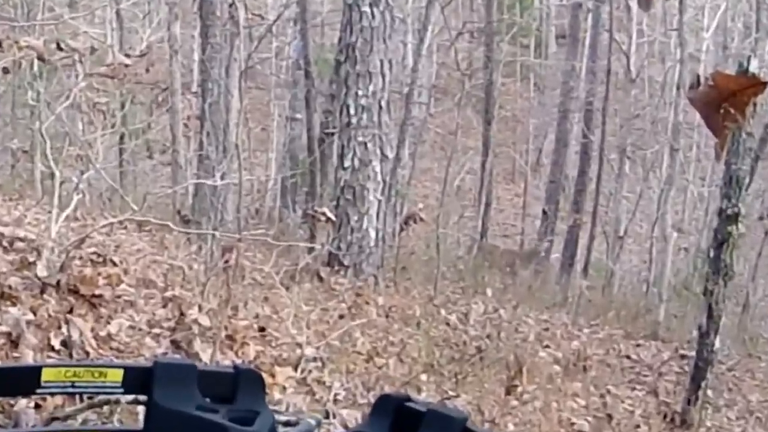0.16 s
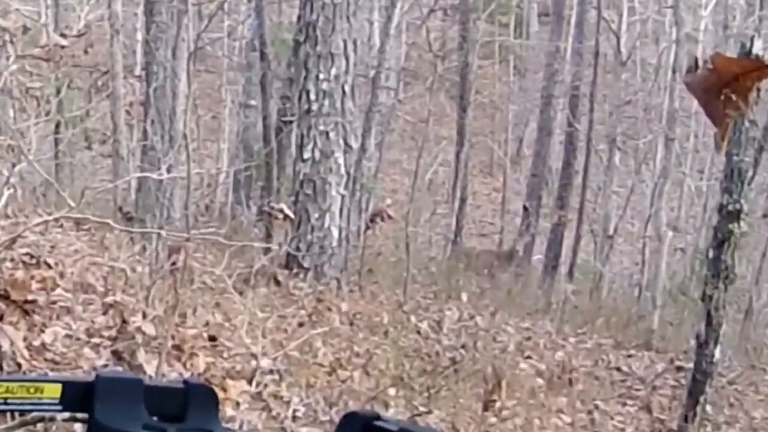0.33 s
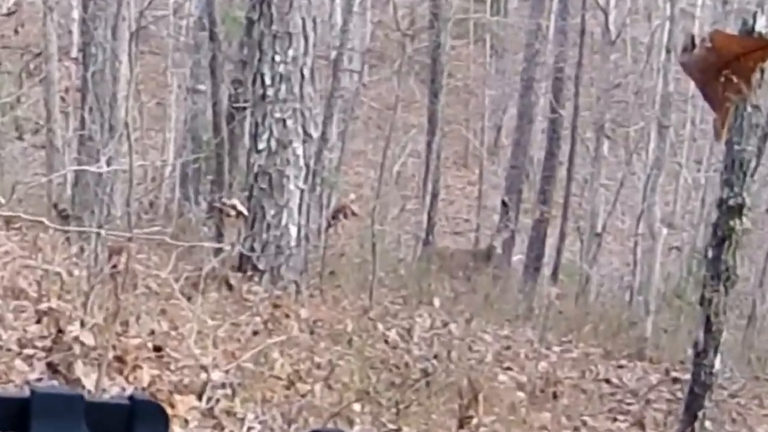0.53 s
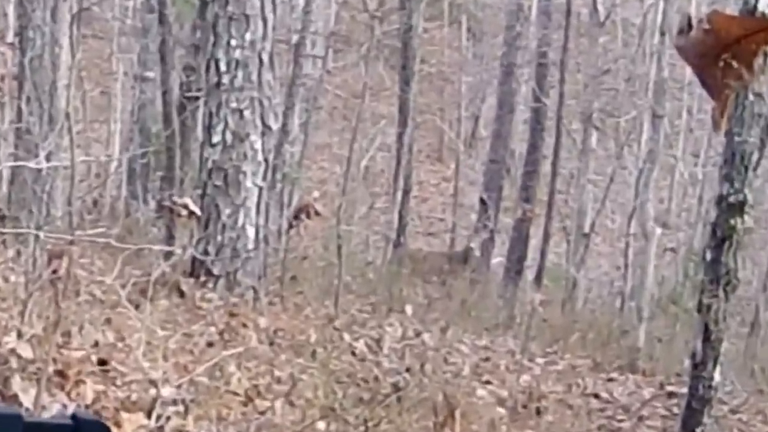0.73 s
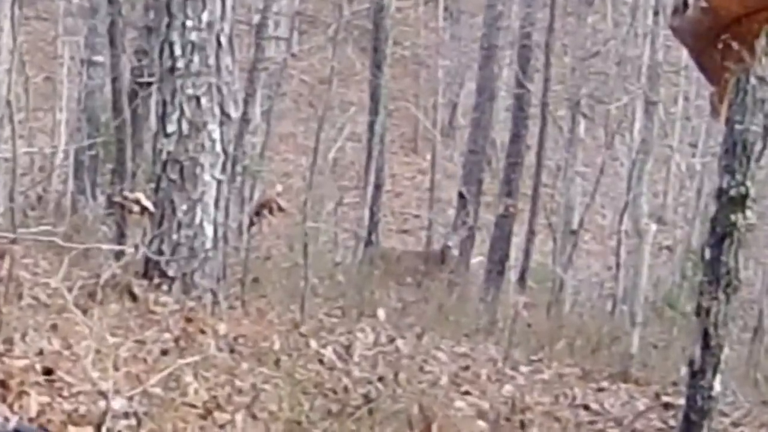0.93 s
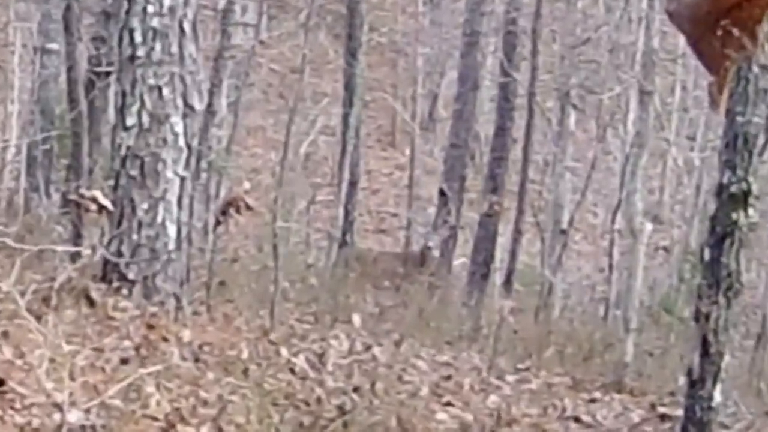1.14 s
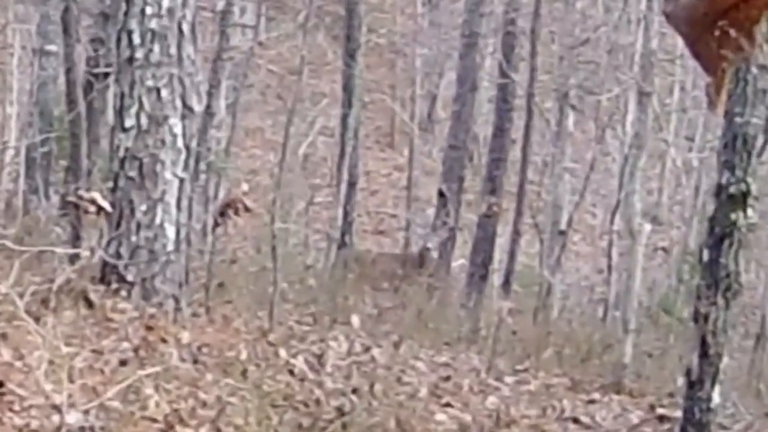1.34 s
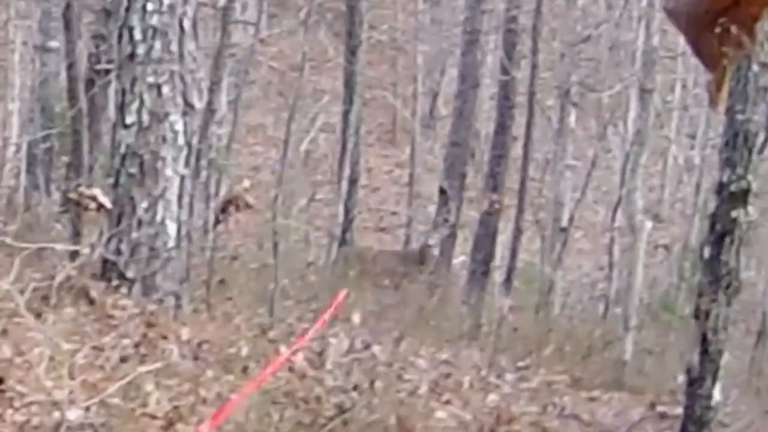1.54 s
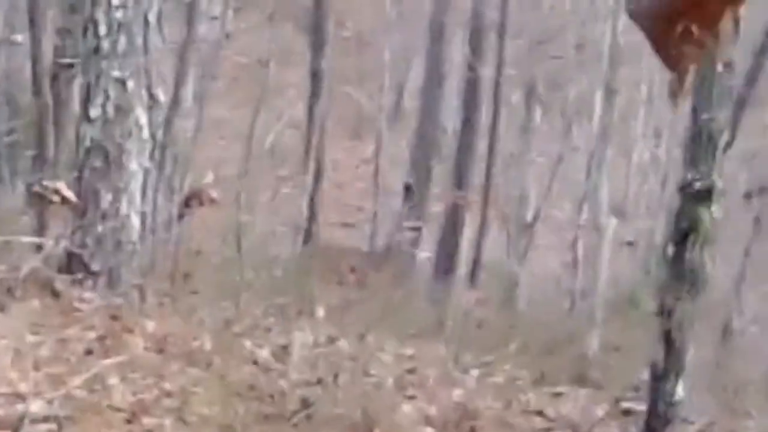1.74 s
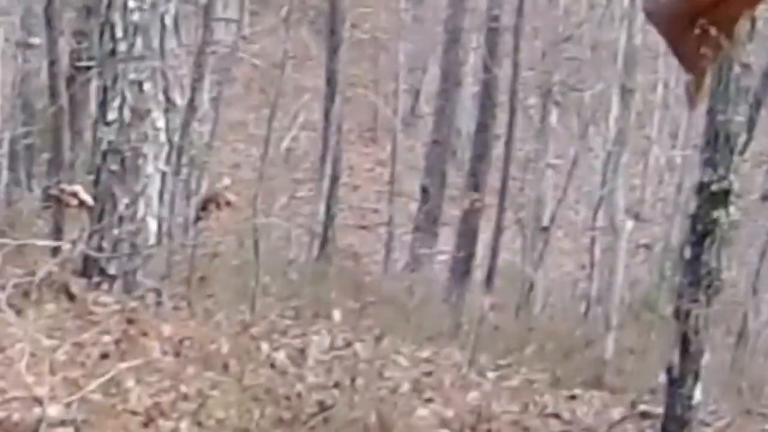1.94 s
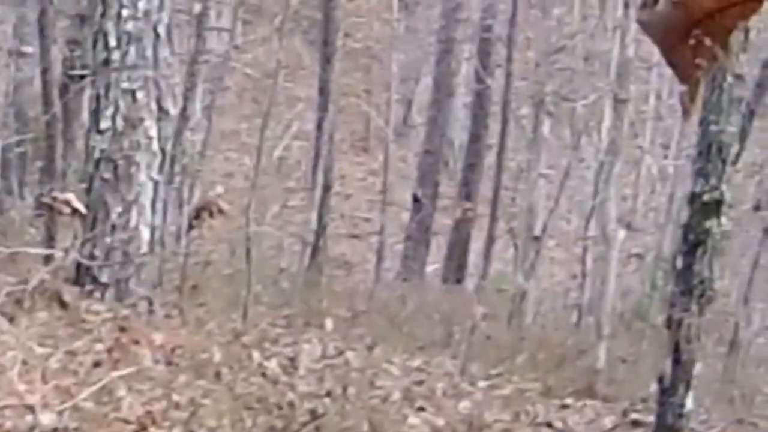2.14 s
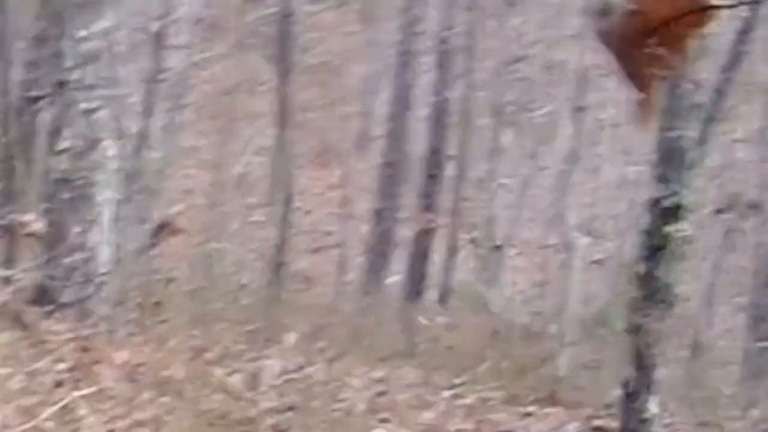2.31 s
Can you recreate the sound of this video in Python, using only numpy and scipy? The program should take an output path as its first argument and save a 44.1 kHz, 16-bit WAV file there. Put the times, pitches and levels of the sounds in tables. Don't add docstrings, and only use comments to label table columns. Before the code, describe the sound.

After a second and a half of soft outdoor hiss, a crossbow string slams with a loud dry crack, slightly overloading the near microphone; faint leaf rustle, a far bolt strike and twig clicks follow.

```python
import sys
import numpy as np
from scipy import signal
from scipy.io import wavfile
from scipy.ndimage import uniform_filter1d

SR = 44100
rng = np.random.default_rng(int(sys.argv[2]) if len(sys.argv) > 2 else 0)


def pcm_store(signal):
    levels = np.round(np.clip(np.atleast_2d(signal), -1, 1) * 32767)
    wavfile.write(sys.argv[1], SR, levels.astype(np.int16).T)


def invert_db(level):
    return 10 ** (np.asarray(level, dtype=float) / 20)


N = 104649
FAR_TOP_HZ = 15350

# frequency in Hz, level in dB per Hz.
HUSH_TONE = [(30, 2), (70, 1), (300, -2), (1000, -7.5), (2500, -14), (5000, -21), (9000, -25),
             (15200, -27.5)]
# frequency in Hz, width in Hz, level in dB.
LATCH_PEAKS = [(900, 600, -9), (1400, 500, -5), (1900, 300, -2), (2900, 600, -1), (3630, 400, 3),
               (4500, 700, -3), (5450, 700, -1), (7000, 900, -6), (8400, 700, -6), (10100, 800, -14),
               (13900, 1000, -18), (15300, 900, -19)]
# frequency in Hz, width in Hz, level in dB.
RISER_PEAKS = [(620, 250, -3), (850, 250, -5), (1260, 200, 1), (1500, 350, 0), (1800, 250, -3),
               (2330, 400, -4), (3190, 400, -3), (3900, 600, -1), (4900, 700, -5), (7200, 1000, -11),
               (8800, 1000, -13), (10500, 1200, -18), (13000, 2200, -20)]
# start in seconds, hold in seconds, T60 in seconds, level in dB.
LATCH_RELEASE = (1.6022, .003, .06, -11)
# start in seconds, frequency in Hz, cycles, level in dB.
STRING_STOP = [
    (1.6102, 170, .5, -12),
    (1.6116, 410, 1.95, -1),
]
# start in seconds, hold in seconds, T60 in seconds, level in dB.
RISER_CRACKS = [
    (1.6108, .002, .02, -18),
    (1.6132, .0022, .012, -7),
    (1.616, .004, .05, -17),
]
# start in seconds, frequency in Hz, level in dB, T60 in seconds.
LIMB_RINGS = [
    (1.613, 245, -19, .08),
    (1.613, 150, -21, .04),
    (1.612, 65, -27, .1),
    (1.6127, 1245, -5, .03),
    (1.624, 455, -18, .052),
    (1.614, 850, -17, .04),
]
# frequency in Hz, T60 in seconds.
SCATTER_DECAY = [(60, .9), (300, .5), (1000, .6), (4000, .6), (9000, .5), (15000, .5)]
# frequency in Hz, level in dB.
SCATTER_TONE = [(60, 2), (200, -4), (400, -9), (600, 4), (1300, 1), (3500, 1), (8000, -2), (15000, 2)]
# centre in seconds, half width in seconds, level in
# dB.
SOFT_SWELLS = [
    (1.675, .025, -53),
    (1.73, .045, -58),
    (2.005, .045, -59),
    (1.93, .08, -62),
    (2.12, .1, -65),
    (2.35, .03, -62),
]
# frequency in Hz, width in Hz, level in dB.
TWIG_PEAKS = [(700, 600, -9), (1420, 700, -4), (2300, 900, -5), (3200, 900, 0), (4050, 900, -1),
              (5000, 1200, -6), (8100, 1500, -8), (9600, 1600, -16), (13500, 2000, -22), (14900, 1000, -19)]
# start in seconds, frequency in Hz, cycles, level in dB.
STOCK_KNOCKS = [
    (1.941, 80, 2.1, -42),
    (1.982, 75, 1.2, -49),
    (2.026, 110, 1.1, -51),
    (2.22, 120, 1.5, -51),
    (1.929, 560, 4.5, -51),
    (1.715, 68, 2.4, -49),
]
# start in seconds, level in dB, brightness factor, hiss level in dB, hiss T60 in seconds.
TWIG_CLICKS = [
    (1.7865, -44, 1.05, -55, .4),
    (1.7882, -40, 1.04, -70, .1),
    (2.2632, -26, 1.0, -51, .4),
]
# frequency in Hz, width in Hz, level in dB.
CLICK_PEAKS = [(1420, 300, -9), (3350, 650, -1), (4050, 800, 0), (8200, 900, -5), (13400, 600, -26),
               (14900, 500, -24)]
# start in seconds, level in dB.
HEAD_CRACK = (1.8349, -22)
# frequency in Hz, width in Hz, level in dB.
HEAD_PEAKS = [(1000, 900, -4), (2930, 700, 1), (4200, 1400, -5), (7700, 1200, -11), (9100, 900, -8),
              (13500, 2500, -17), (15200, 1000, -14)]
# start in seconds, hold in seconds, T60 in seconds, level in dB.
BOLT_STRIKES = [
    (1.835, .005, .06, -39),
    (1.84, .02, .8, -52),
    (1.866, .01, .1, -49),
]
# frequency in Hz, width in Hz, level in dB.
THUD_PEAKS = [(60, 40, 6), (160, 100, 2), (500, 250, 2), (700, 250, 3), (1030, 400, 0), (1700, 700, -4),
              (2900, 900, -8), (4500, 1500, -12), (7700, 1800, -16), (9500, 2000, -17), (14000, 2500, -21)]
# frequency in Hz, width in Hz, depth in dB.
HOUSING_NOTCHES = [(6050, 500, -12), (12050, 400, -13)]


def evened(x):
    return x / np.sqrt(np.mean(x ** 2) + 1e-20)


def read(points, hz):
    f, value = np.transpose(points)
    return np.interp(np.log(hz + 1), np.log(f + 1), value)


def hush():
    frames, hz = N // 256 + 5, np.fft.rfftfreq(1024, 1 / SR)
    a, b, patches = rng.standard_normal((frames, 513, 3)).T
    patches = uniform_filter1d(patches, 12, 0)
    patches = evened(uniform_filter1d(patches, 14, 1))
    gain = invert_db(read(HUSH_TONE, hz)[:, None] + .5 * patches)
    in_band = (hz > 0) & (hz < FAR_TOP_HZ)
    noise = signal.istft((a + 1j * b) * gain * in_band[:, None], nperseg=1024, noverlap=768)[1]
    return invert_db(-59) * evened(noise[:N])


def add(mix, s, sound):
    part = mix[round(s * SR):][:len(sound)]
    part += sound[:len(part)]


def body(x, peaks, shift=1):
    out = 0
    for k, (hz, width, db) in enumerate(peaks):
        r = np.exp(-np.pi * width / SR)
        w = 2 * np.pi * hz * shift / SR
        ring = signal.lfilter([np.sin(w) * (1 - r)], [1, -2 * r * np.cos(w), r * r], x)
        out = out + (-1) ** k * invert_db(db) * ring
    return out


def rattle(hold, t60, db, peaks, spread_db=2.2):
    t = np.arange(0, .4, 1 / SR)
    ticks = rng.standard_normal(len(t)) * invert_db(spread_db * rng.exponential(1, len(t)))
    shape = np.minimum(t / .0006, 1) * invert_db(-60 * np.maximum(t - hold, 0) / t60)
    level = np.sqrt(np.mean(body(ticks[:4000], peaks) ** 2))
    return invert_db(db) * body(ticks * shape, peaks) / level


def latch():
    out = np.zeros(N)
    start, *row = LATCH_RELEASE
    add(out, start, rattle(*row, LATCH_PEAKS))
    return out


def swing(hz, cycles, db):
    u = np.arange(0, cycles, hz / SR)
    return invert_db(db) * np.sin(2 * np.pi * u) * np.sin(np.pi * u / cycles) ** .35


def string_stop():
    out = np.zeros(N)
    for s, *row in STRING_STOP:
        add(out, s, swing(*row))
    for s, *row in RISER_CRACKS:
        add(out, s, rattle(*row, RISER_PEAKS))
    return out


def limbs():
    out, t = np.zeros(N), np.arange(0, .2, 1 / SR)
    for s, hz, db, t60 in LIMB_RINGS:
        add(out, s, np.minimum(t * hz, 1) * invert_db(db - 60 * t / t60) * np.sin(2 * np.pi * hz * t))
    return out


def wood(x):
    stand_s, stand_width_s, stand_db = .068, .012, 5
    taps = np.zeros(SR)
    at = np.arange(900, SR - 20, 20)
    taps[at + rng.integers(0, 20, len(at))] = rng.choice([-1., 1.], len(at))
    hz, t, z = signal.stft(taps, SR, nperseg=512)
    stand = stand_db * np.exp(-((t - stand_s) / stand_width_s) ** 2)
    decay = -60 * t / read(SCATTER_DECAY, hz)[:, None]
    z = z * invert_db(stand + read(SCATTER_TONE, hz)[:, None] + decay)
    tail = signal.istft(z, SR, nperseg=512)[1]
    return invert_db(-32) * signal.fftconvolve(x, tail / np.linalg.norm(tail))[:N]


def soft_swells():
    t = np.arange(N) / SR
    grains = rng.standard_normal(N) * invert_db(1.4 * rng.exponential(1, N))
    swells = sum(invert_db(db) * np.exp(-((t - s) / w) ** 2) for s, w, db in SOFT_SWELLS)
    return evened(body(grains, TWIG_PEAKS)) * swells


def stock():
    out = np.zeros(N)
    for s, *row in STOCK_KNOCKS:
        add(out, s, swing(*row))
    return out


def snap(db, peaks, shift=1, rise_s=.00002):
    t = np.arange(0, .02, 1 / SR)
    splinters = .12 * rng.standard_normal(len(t)) * np.exp(-t / .0008)
    x = body((t == 0) + splinters, peaks, shift)
    x = x * np.sin(np.pi / 2 * np.minimum(t / rise_s, 1)) ** 2
    return -invert_db(db) * x / abs(x).max()


def twigs():
    out, t = np.zeros(N), np.arange(0, .3, 1 / SR)
    for s, db, shift, hiss_db, t60 in TWIG_CLICKS:
        add(out, s, snap(db, CLICK_PEAKS, shift, rise_s=.0006))
        hiss = evened(body(rng.standard_normal(len(t)), TWIG_PEAKS, shift))
        add(out, s, hiss * np.minimum(t / .002, 1) * invert_db(hiss_db - 60 * t / t60))
    return out


def bolt_head():
    out = np.zeros(N)
    start, db = HEAD_CRACK
    add(out, start, snap(db, HEAD_PEAKS))
    return out


def bolt_thud():
    out = np.zeros(N)
    for s, *row in BOLT_STRIKES:
        add(out, s, rattle(*row, THUD_PEAKS, spread_db=1.5))
    return out


def scene():
    bow = latch() + string_stop() + limbs()
    far = hush() + wood(bow) + soft_swells() + stock() + twigs() + bolt_thud()
    trim = signal.firwin(255, FAR_TOP_HZ, window=("kaiser", 6), fs=SR)
    return (bow + bolt_head() + signal.oaconvolve(far, trim, "same"))[None]


def housing(x):
    hz = abs(np.fft.fftfreq(4096, 1 / SR))
    notch_db = sum(db / (1 + ((hz - f) / w) ** 2) for f, w, db in HOUSING_NOTCHES)
    log_gain = np.log(invert_db(notch_db))
    taps = np.fft.ifft(np.exp(np.conj(signal.hilbert(log_gain)))).real[:2048]
    return signal.oaconvolve(x, taps)[:len(x)]


def roll_off(x):
    return signal.sosfilt(signal.butter(12, 17010, fs=SR, output="sos"), x)


def record(dry):
    ceiling = 1.05
    x = housing(dry[0])
    x = ceiling * np.tanh(x / ceiling)
    band_limit = signal.firwin(255, 16500, window=("kaiser", 9), fs=SR)
    x = signal.oaconvolve(x, band_limit, "same")
    return roll_off(x[None])


dry = scene()
out = record(dry)
pcm_store(out)
```